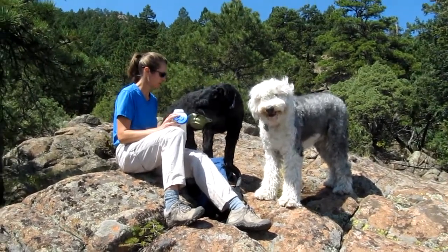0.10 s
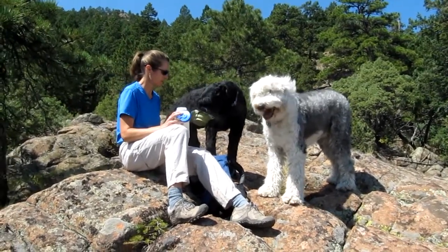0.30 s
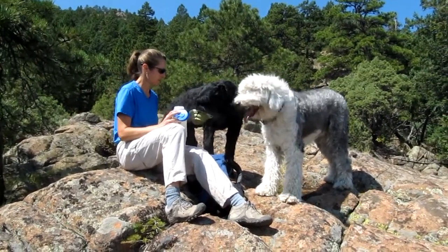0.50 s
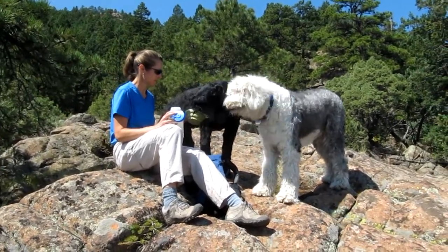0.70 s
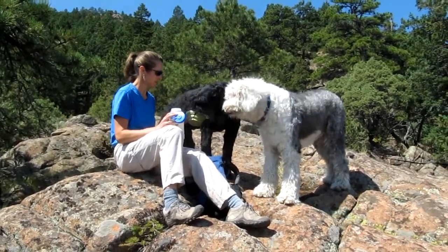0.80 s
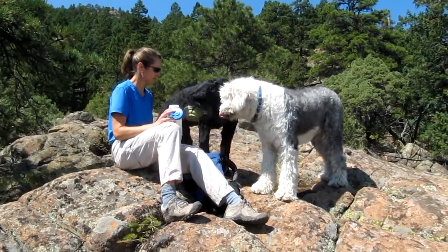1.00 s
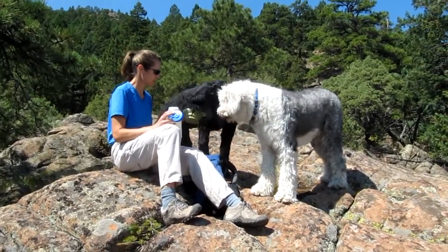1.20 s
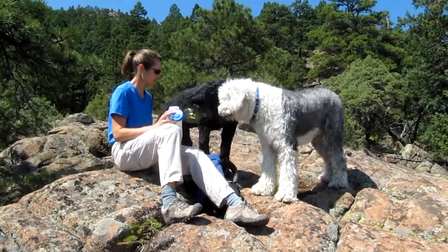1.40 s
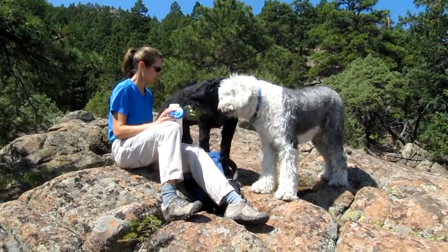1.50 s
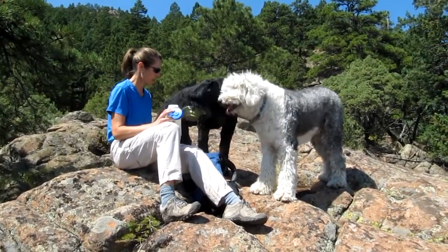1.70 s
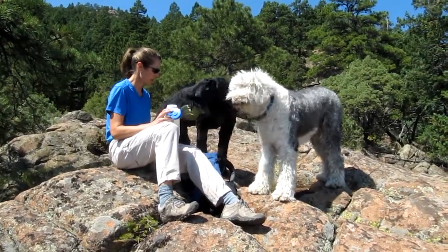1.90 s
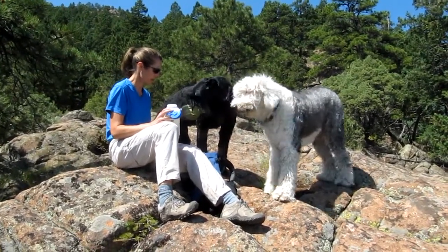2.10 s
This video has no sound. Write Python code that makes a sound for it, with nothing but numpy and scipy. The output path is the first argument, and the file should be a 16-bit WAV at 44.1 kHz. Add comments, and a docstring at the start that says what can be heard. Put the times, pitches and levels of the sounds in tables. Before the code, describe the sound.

Wet, bubbly dog lapping, about three laps a second, with low wind thumps on an open hilltop

```python
"""Wind rumbles and flutters on a microphone over hissing pines and a camera's thin whine, on an open hilltop.
Then a dog snuffs and laps water from a small cup, about three laps a second.
Filtered noise makes the wind, puffs and slosh; damped, upward-gliding sines make the bubbles and crackle.
Mouth resonances and noise bursts make the smacks, noise bursts the ticks, single pressure pulses the thumps."""
import sys
import numpy as np
from scipy import signal
from scipy.fft import rfft, irfft
from scipy.io import wavfile
from scipy.ndimage import uniform_filter1d

SR = 44100
rng = np.random.default_rng(int(sys.argv[2]) if len(sys.argv) > 2 else 0)


def master_out(mix):
    """Clip the mix to full scale and print it as 16-bit PCM to the path in sys.argv[1]."""
    frames = np.transpose(np.atleast_2d(mix))
    ceiling = np.clip(frames, -1, 1)
    pcm = np.round(ceiling * 32767).astype(np.int16)
    wavfile.write(sys.argv[1], SR, pcm)


N = 94815
T = np.arange(N) / SR

# Laps of the tongue: t/s, duration/s, crackle level/dB, spray level/dB, slosh level/dB
LAP_EVENTS = [(0.211, 0.12, -43, -49, -40), (0.586, 0.12, -38, -52.5, -39), (0.886, 0.095, -45, -52, -44),
              (1.206, .09, -40, -53, -36.5), (1.519, .10, -45.5, -53.5, -44), (1.831, 0.084, -41, -56, -36)]
# Spectrum of a water splat: f/Hz, relative level/dB
SPLAT_SPECTRUM = [(200, 6.5), (600, 6.5), (1500, 2.5), (3000, -3.5), (5200, -2), (7200, -12), (10000, -8),
                  (12000, -18.5), (13500, -27), (15500, -42)]
# Spectrum of bursting water films: f/Hz, relative level/dB
FILM_SPECTRUM = [(1000, 0.5), (4000, -13.5), (7000, -14), (9000, 2), (10800, 4.5), (12200, -6),
                 (13500, -13.5), (15500, -33)]

SMACK_T60_S, TICK_T60_S = 0.017, 0.0066
BUBBLE_RISE_S, BUBBLE_GLIDE_PER_S = 0.00056, 5.55  # onset time; fractional pitch climb per second


def amp(db):
    """Level to amplitude ratio: 20 dB is a factor of ten."""
    return 10 ** (np.asarray(db) / 20)


def evened(x):
    """Normalization: scales a signal to an rms of one."""
    return x / np.sqrt(np.mean(x ** 2) + 1e-20)


def add(mix, s, sound):
    """Superposition: sums a sound into the mix from time s, in place."""
    part = mix[round(s * SR):][:len(sound)]
    part += sound[:len(part)]


def coloured(x, points):
    """Spectral filtering: levels interpolated over log frequency, scaled to an rms of one."""
    hz, db = np.transpose(points)
    f = np.fft.rfftfreq(len(x), 1 / SR)
    gain = amp(np.interp(np.log(f + 1), np.log(hz + 1), db))
    return evened(irfft(rfft(x) * gain, len(x)))


def drift(rate_hz):
    """Slow random fluctuation: Gaussian low-passed noise with an rms of one."""
    f = np.fft.rfftfreq(N, 1 / SR)
    return evened(irfft(rfft(rng.standard_normal(N)) * np.exp(-(f / rate_hz) ** 2), N))


def swell(length, peak):
    """Amplitude envelope: rises to one at a share of its length and sinks back."""
    u = np.linspace(0, 1, int(length * SR))
    return np.sin(np.pi / 2 * np.interp(u, [0, peak, 1], [0, 1, 0]))


def wind():
    """Turbulent pressure on the microphone: low rumble and lumpy flutter as noise of varying level."""
    # Wind strength: t/s, rumble level/dB (raised below), flutter level/dB
    strength = [(0.0, -30, -78), (0.07, -34.5, -35), (0.29, -25.5, -29.5), (0.44, -28, -32.5),
                (0.62, -27.5, -31.5), (0.92, -27, -24), (1.07, -26.5, -34), (1.23, -26, -26),
                (1.36, -23, -20.5), (1.52, -26.5, -46), (1.91, -35, -36.5), (2.03, -27.5, -38),
                (2.15, -40, -36.5)]
    # Low turbulence: f/Hz, relative level/dB
    rumble_spectrum = [(10, 5), (25, 0), (50, 1.5), (90, -11.5), (160, -23.5), (400, -69.5)]
    # Faster turbulence: f/Hz, relative level/dB
    flutter_spectrum = [(30, 4.5), (90, 3.5), (180, -5.5), (300, -10.5), (500, -24), (1200, -64.5)]
    rumble_raise_db, gust_rms_db = 2.5, 0.5
    s, rumble_db, flutter_db = np.transpose(strength)

    rumble_gain = amp(np.interp(T, s, rumble_db) + rumble_raise_db)
    flutter_gain = amp(np.interp(T, s, flutter_db) + gust_rms_db * drift(rate_hz=37))
    rumble = rumble_gain * coloured(rng.standard_normal(N), rumble_spectrum)
    return rumble + flutter_gain * coloured(rng.standard_normal(N), flutter_spectrum)


def pines():
    """Broadband noise of wind in distant trees, slowly fluctuating and mostly sinking in level."""
    # Strength of the hiss: t/s, level/dB
    strength = [(0, -38.5), (.4, -41.5), (.8, -40.5), (1.2, -43), (1.6, -46.5), (2.15, -44.5)]
    # Spectrum of the trees: f/Hz, relative level/dB
    tree_spectrum = [(150, -18), (300, -2), (650, 0), (1200, -6), (2500, -16), (5000, -23), (12000, -50)]
    level_db = np.interp(T, *np.transpose(strength)) + 1.55 * drift(rate_hz=16)
    return amp(level_db) * coloured(rng.standard_normal(N), tree_spectrum)


def hiss():
    """Stationary noise: an even hiss at a constant level."""
    # Spectrum of the hiss: f/Hz, relative level/dB
    hiss_spectrum = [(150, 9), (250, 0.5), (650, -1), (1200, -14), (2000, -14), (3400, -20.5),
                     (5000, -22.5), (7100, -23.5), (8500, -21.5), (10400, -20), (11600, -23.5),
                     (13000, -34), (15500, -37)]
    return amp(-44) * coloured(rng.standard_normal(N), hiss_spectrum)


def camera_whine():
    """Phase modulation: a steady sine with a lopsided warble at a rate and at twice that rate."""
    whine_hz, warble_hz, rms_db = 7881, 29.4, -61
    sweep = 2 * np.pi * warble_hz * T
    warble = 0.85 * np.sin(sweep) + 0.6 * np.sin(2 * sweep)  # radians
    return amp(rms_db) * np.sqrt(2) * np.sin(2 * np.pi * whine_hz * T + warble)


def snuffs():
    """Turbulent airflow: soft puffs of coloured noise through the dog's muzzle."""
    # Puffs: t/s, duration/s, level/dB
    puffs = [(0.041, 0.091, -38.5), (0.307, 0.1, -43.5), (0.447, .05, -44.5), (1.782, 0.073, -45)]
    # Spectrum of the muzzle: f/Hz, relative level/dB
    muzzle_spectrum = [(400, -9), (1400, -7.5), (2500, -2), (3050, 1.5), (3600, -11.5), (6000, -21),
                       (15500, -29)]
    out = np.zeros(N)
    for s, length, db in puffs:
        env = swell(length, peak=0.29)
        add(out, s, amp(db) * env * coloured(rng.standard_normal(len(env)), muzzle_spectrum))
    return out


def ring(hz, t60, rise, glide):
    """Damped resonance: a pocket of air rings and climbs in pitch as it nears the surface."""
    t = np.arange(0, t60 + rise, 1 / SR)
    tone = np.sin(2 * np.pi * hz * (t + glide * t ** 2 / 2))
    return tone * np.minimum(t / rise, 1) * amp(-60 * np.maximum(t - rise, 0) / t60)


def burst(points, t60, size=2048):
    """Impulsive noise: a quickly dying coloured snap with a peak near one."""
    t = np.arange(size) / SR
    env = amp(-60 * t / t60) * np.minimum(t / 0.00078, 1)  # rise time in s
    snap = coloured(rng.standard_normal(size), points) * env
    decay_norm = np.sqrt(t60 * SR / (2 * np.log(1000)))  # norm of a decay that starts at one
    return 0.34 * snap * decay_norm / np.linalg.norm(snap)


def bubbles():
    """Volume resonance: each bubble snaps as it forms, then rings in the cup with an uneven amplitude."""
    # Bubbles: t/s, level/dB, starting f/Hz, T60/s
    bubble_events = [(.067, -33.5, 4980, .025), (.136, -22, 1246, 0.045), (0.139, -33.5, 1770, 0.064),
                     (.276, -32.5, 4500, 0.019), (.502, -23, 1900, 0.015), (0.5805, -23.5, 1380, 0.034),
                     (0.581, -33.5, 2730, 0.046), (.597, -25.5, 1950, 0.051), (.659, -33, 1620, 0.02),
                     (.666, -33, 2920, 0.025), (.684, -21.5, 1600, 0.012), (.706, -29, 1378, 0.036),
                     (0.912, -29, 1510, 0.021), (0.9395, -25, 2560, 0.019), (.956, -31, 1300, .022),
                     (.973, -29.5, 1190, 0.014), (1.0341, -28, 1120, 0.017), (1.044, -38.5, 5240, 0.027),
                     (1.145, -31, 1520, 0.019), (1.2165, -26, 2430, 0.0265), (1.235, -35, 1530, .025),
                     (1.246, -25.5, 1990, 0.014), (1.258, -34, 1540, .022), (1.291, -29, 2360, 0.016),
                     (1.298, -38, 3280, 0.038), (1.5855, -26.5, 1510, 0.025), (1.6703, -35.5, 5320, 0.012),
                     (1.851, -19.5, 1506, 0.045), (1.858, -21, 1150, 0.057), (1.891, -23, 1467, 0.05),
                     (1.9855, -32, 1090, 0.02)]
    pop_db, gurgle = -3.5, 0.17  # snap level; rms unevenness of the ring
    out = np.zeros(N)
    for s, db, hz, t60 in bubble_events:
        note = ring(hz, t60, BUBBLE_RISE_S, BUBBLE_GLIDE_PER_S)
        wobble = evened(uniform_filter1d(rng.standard_normal(4096), size=70))
        add(out, s, amp(db) * note * (1 + gurgle * np.resize(wobble, len(note))))
        add(out, s, amp(db + pop_db) * burst(SPLAT_SPECTRUM, SMACK_T60_S))
    return out


def fuzz(hz):
    """Broad resonance: a wet slap stirs noise around one pitch of the mouth."""
    width_octaves, rise_s = 0.28, 0.0026  # from the centre to half amplitude; time to the peak
    t = np.arange(2048) / SR
    offset = np.log2((np.fft.rfftfreq(len(t), 1 / SR) + 1) / hz) / width_octaves
    band = evened(irfft(rfft(rng.standard_normal(len(t))) / (1 + offset ** 2)))
    return 0.5 * band * t / rise_s * np.exp(1 - t / rise_s)


def smacks():
    """Impact excitation: each tongue smack rings the mouth, stirs soft fuzz and splats the water."""
    # Smacks: t/s, reference level/dB, starting f/Hz of the mouth, splat level re reference/dB
    smack_events = [(.164, -28, 2260, 4.5), (0.22, -26, 1190, -8), (.238, -15, 600, -17),
                    (.239, -15.5, 990, -8), (0.296, -32, 1300, 10), (.318, -30, 3170, 11),
                    (0.513, -22.5, 2300, -0.5), (0.582, -14.5, 1360, -23), (0.5968, -23, 1810, -3),
                    (.603, -12.5, 630, -4.5), (.608, -27.5, 5550, -8), (0.805, -33.5, 4440, 7),
                    (.828, -20.5, 1176, -2.5), (0.895, -27, 1500, -10), (0.8968, -13.5, 790, -1),
                    (0.902, -25.5, 1550, -4), (0.985, -24, 4600, 1), (0.9927, -25, 4380, -4),
                    (1.033, -23, 1090, -10), (1.063, -37, 1800, -5), (1.213, -24, 1000, -12),
                    (1.225, -18.5, 1730, -15), (1.271, -18.5, 1455, -8), (1.3611, -21, 1140, -2),
                    (1.367, -31.5, 3000, 10.5), (1.447, -25.5, 1945, 3.5), (1.533, -22.5, 1480, -3),
                    (1.568, -28.5, 3200, 1), (1.584, -29, 1650, -4), (1.671, -31, 5760, -13),
                    (1.674, -31, 1180, 2), (1.8435, -21, 3050, -8), (1.851, -11.5, 1600, 3.5),
                    (1.8545, -30, 2800, 2), (1.8898, -21, 1950, 4.5), (1.928, -32, 2960, 7),
                    (1.957, -38, 3780, -14), (1.985, -33, 1090, -18), (2.121, -27.5, 3650, 3.5)]
    mouth_db, fuzz_db = -6, -7  # re reference
    out = np.zeros(N)
    for s, db, hz, bright_db in smack_events:
        add(out, s, amp(db + mouth_db) * ring(hz, t60=0.0065, rise=0.0011, glide=1.3))
        add(out, s, amp(db + fuzz_db) * fuzz(hz))
        add(out, s, amp(db + bright_db) * burst(SPLAT_SPECTRUM, SMACK_T60_S))
    return out


def crackle_patch(length, size):
    """Random superposition of tiny bubbles: short rings, each decaying over a fixed number of cycles."""
    centre_hz, log_spread, cycles, per_s = 2175, 1.52, 4.9, 1200  # spread each way, in natural log
    patch = np.zeros(size)
    for at, strength, pitch in rng.random((int(per_s * length) + 1, 3)):
        hz = centre_hz * np.exp(log_spread * (2 * pitch - 1))
        gain = amp(25 * strength ** 3) * (centre_hz / hz) ** 0.052
        add(patch, at * length, gain * ring(hz, cycles / hz, rise=0.0004, glide=14))
    return evened(patch)


def spray_patch(length, size):
    """Shot noise: a fine spray of many short film bursts at random times."""
    patch = np.zeros(size)
    for at, strength in rng.random((int(1700 * length) + 1, 2)):  # 1700 bursts per second
        add(patch, at * length, amp(25 * strength ** 3) * burst(FILM_SPECTRUM, t60=0.0042, size=256))
    return evened(patch)


def splashes():
    """Agitated water: each lap is lumpy slosh noise under a swell of crackle and spray."""
    # Spectrum of the slosh: f/Hz, relative level/dB
    slosh_spectrum = [(400, 1), (900, -6), (1500, 10.5), (2400, -0.5), (3400, 0.5), (5000, -8), (8000, -22),
                      (15500, -50)]
    lumps_db, lumps_hz = 6, 220  # rms before the highest lumps are limited; fluctuation rate
    out = np.zeros(N)
    for s, length, crackle_db, spray_db, slosh_db in LAP_EVENTS:
        env = swell(length, peak=0.16)
        lumps = evened(amp(lumps_db * np.minimum(drift(lumps_hz)[:len(env)], 2)))
        slosh = coloured(rng.standard_normal(len(env)), slosh_spectrum)
        add(out, s, amp(slosh_db) * env ** 2 * lumps * slosh)
        add(out, s, amp(crackle_db) * env * crackle_patch(length, len(env)))
        add(out, s, amp(spray_db) * env * spray_patch(length, len(env)))
    return out


def dribble():
    """Drop impacts: from each lap's start small drops fall from tongue and lips, ringing and splatting."""
    per_s, duration_s, t60 = 340, 0.19, 0.015
    top_db, spread_db, splat_db = -40, 21.5, 5  # loudest ring; range below it; splat re ring
    low_hz, high_hz = 850, 3290
    out = np.zeros(N)
    for s, *_ in LAP_EVENTS:
        for at, softness, pitch in rng.random((int(per_s * duration_s), 3)):
            start = s + at * duration_s
            hz = low_hz * (high_hz / low_hz) ** pitch
            gain = amp(top_db - spread_db * softness)
            add(out, start, gain * ring(hz, t60, BUBBLE_RISE_S, BUBBLE_GLIDE_PER_S))
            add(out, start, gain * amp(splat_db) * burst(SPLAT_SPECTRUM, TICK_T60_S, size=512))
    return out


def ticks():
    """Impulsive release: bursting water films give short, bright snaps."""
    # Film bursts: t/s, level/dB
    film_bursts = [(0.231, -27.5), (0.2406, -25), (.278, -40), (0.607, -24), (.6265, -19), (0.6365, -26),
                   (.899, -34), (0.933, -26), (0.947, -26), (1.245, -24.5), (1.3615, -18), (1.5763, -17),
                   (1.8545, -34), (1.883, -21)]
    out = np.zeros(N)
    for s, db in film_bursts:
        add(out, s, amp(db) * burst(FILM_SPECTRUM, TICK_T60_S))
    return out


def eddies():
    """Vortex pressure: each eddy pushes and pulls the microphone once, with a short turbulent wake."""
    # Eddies: t/s, pulse peak/dB, pulse f/Hz, wake level/dB, wake duration/s, wake edge f/Hz
    eddy_events = [(0.295, -10.5, 98, -26.5, 0.057, 195), (0.341, -28, 140, -28.5, 0.037, 235),
                   (0.386, -20, 44, -25.5, 0.043, 212), (0.718, -14.5, 16.5, -53, 0.022, 60),
                   (.866, -2, 175, -17, .02, 270), (0.911, -13, 140, -25, 0.079, 155),
                   (.995, -7, 88, -43, 0.016, 200), (1.027, -4, 93, -24.5, 0.052, 159),
                   (1.163, -12.5, 56, -18.5, 0.027, 288), (1.181, -13, 54, -34, 0.022, 130),
                   (1.223, -8, 23, -17.5, 0.011, 250), (1.247, -3, 59, -19.5, 0.069, 200),
                   (1.271, -9, 81, -23.5, 0.039, 224), (1.307, -11, 90, -29, 0.021, 188),
                   (1.335, -43, 48, -29, 0.024, 220), (1.4118, -2.5, 205, -13.5, .022, 420),
                   (1.446, -25, 260, -21, 0.086, 266), (1.483, -4, 250, -14, .028, 460),
                   (1.497, -3, 125, -16, .028, 310), (1.519, -14.5, 110, -28, 0.036, 306),
                   (1.63, -16, 100, -59, 0.017, 200), (1.737, -14.5, 83, -34, 0.044, 171),
                   (1.792, -14.5, 83, -30, 0.024, 210), (1.871, -13.5, 58, -27.5, 0.023, 109)]
    wake_slope = 4.37  # exponent of the amplitude's fall far above the edge
    out = np.zeros(N)
    f = np.fft.rfftfreq(N, 1 / SR)
    for s, db, hz, wake_db, length, edge_hz in eddy_events:
        u = 2 * np.pi * hz * (T - s)
        out -= amp(db) * u * np.exp((1 - u ** 2) / 2)
        edge = f / edge_hz
        wake_gain = np.sqrt(edge) / (1 + edge ** (wake_slope + 0.5))
        churn = irfft(rfft(rng.standard_normal(N)) * wake_gain, N)
        env = swell(length, peak=0.24) ** 2
        # the wake sets in 4 ms before the centre of the pulse
        add(out, s - 0.004, amp(wake_db) * evened(env * churn[:len(env)]))
    return out


def rock(x):
    """Diffuse reflection: brief scatter from the cup, the bodies and the bare rock, as decaying noise."""
    scatter_db, t60 = -12.5, 0.021
    t = np.arange(SR // 8) / SR
    tail = rng.standard_normal(len(t)) * amp(-60 * t / t60) * (t > 0.002)  # first echo after 2 ms
    return x + amp(scatter_db) * signal.fftconvolve(x, tail / np.linalg.norm(tail))[:N]


def scene():
    """Superposition of hilltop and dog; only the water and mouth sounds scatter from the surroundings."""
    background = wind() + pines() + hiss() + camera_whine()
    lapping = bubbles() + smacks() + splashes() + dribble() + ticks()
    return (background + snuffs() + rock(lapping) + eddies())[None]


def record(dry):
    """Overload and band limiting: the recorder clips the peaks, then cuts off the top of the spectrum."""
    edge_hz = 15750
    low_pass = signal.firwin(1023, edge_hz, window=("kaiser", 9), fs=SR)
    return signal.oaconvolve(np.clip(dry, -1.1, 1.1), low_pass[None], "same")


dry = scene()
out = record(dry)
master_out(out)
```